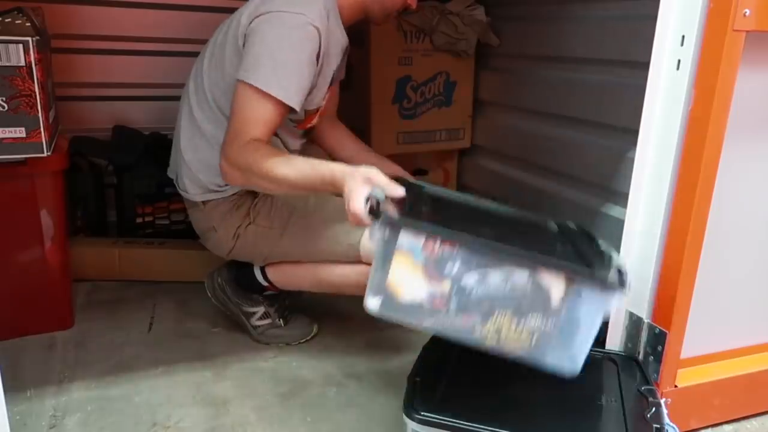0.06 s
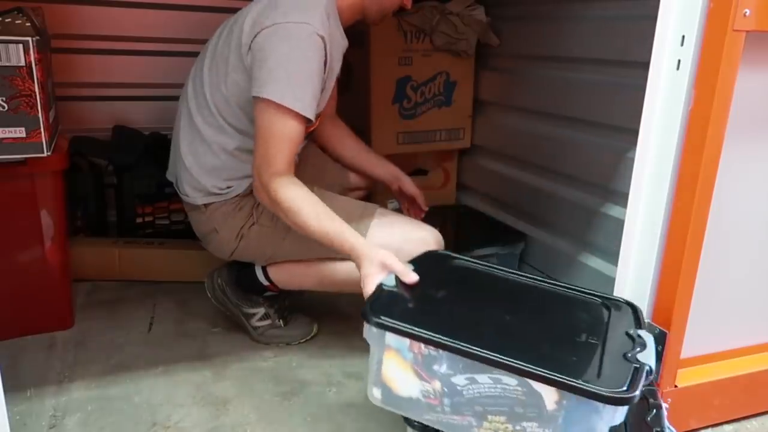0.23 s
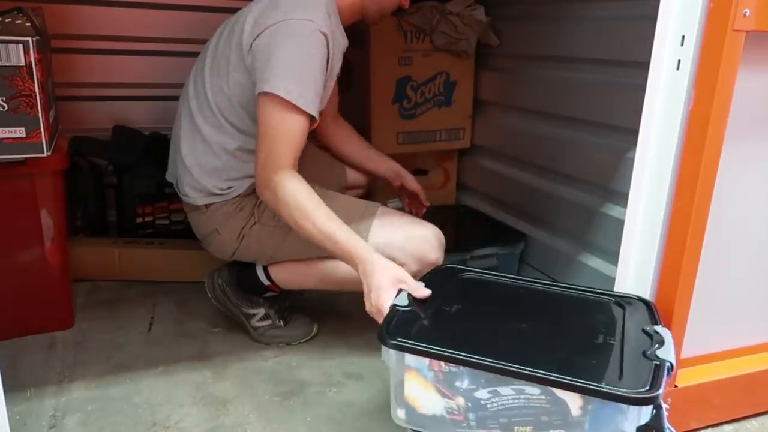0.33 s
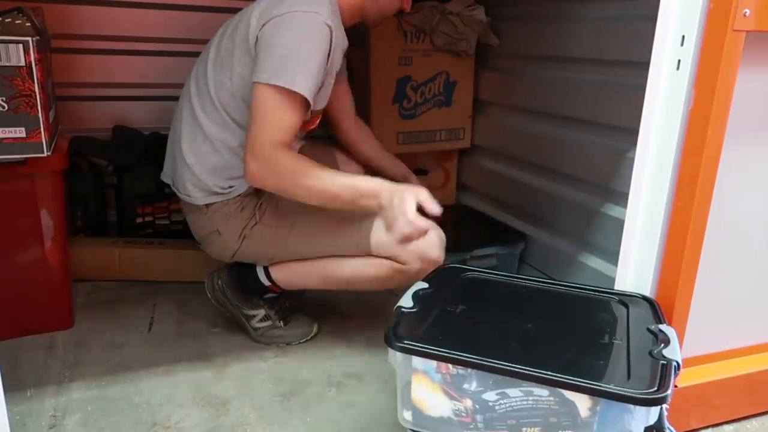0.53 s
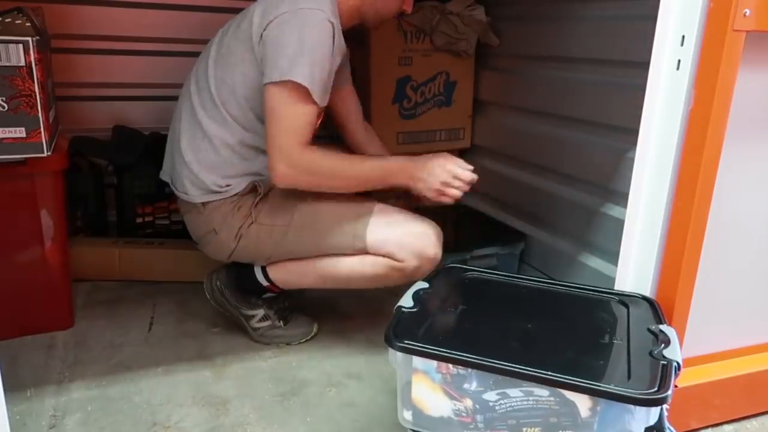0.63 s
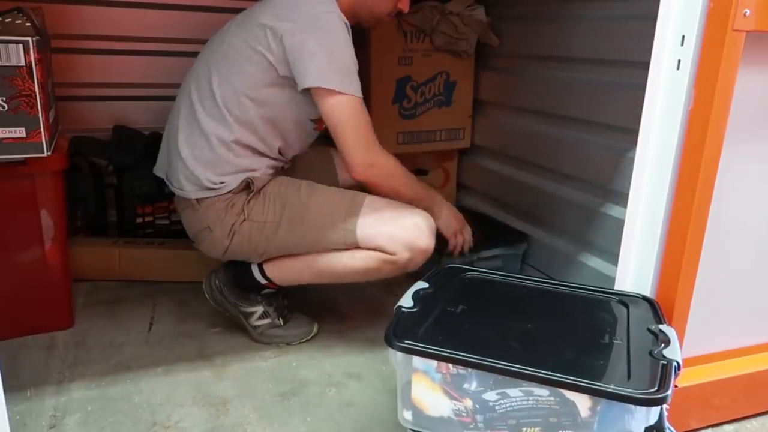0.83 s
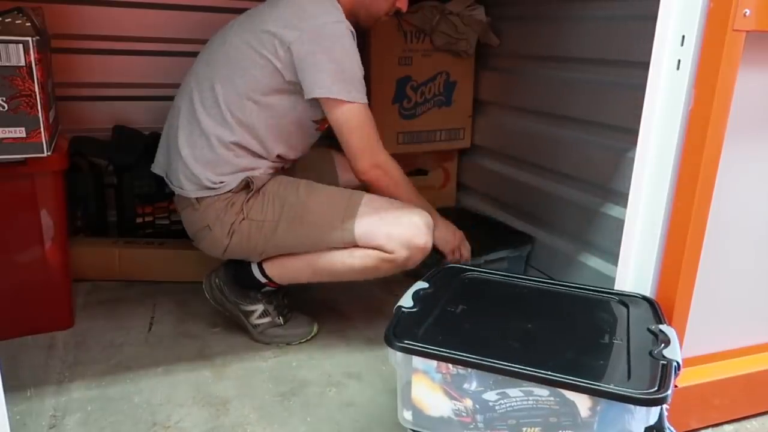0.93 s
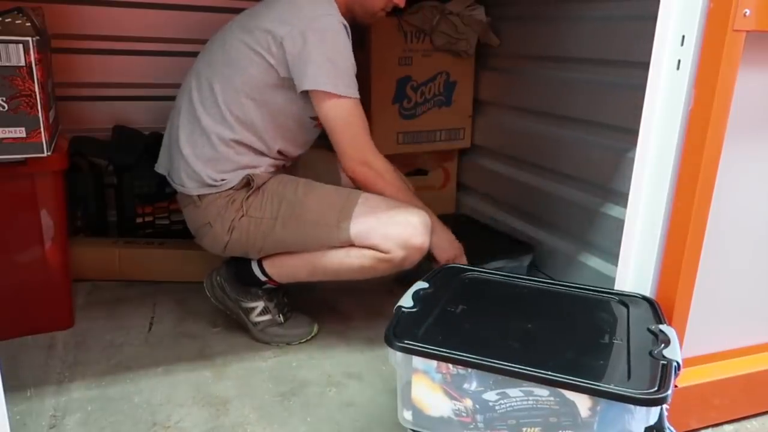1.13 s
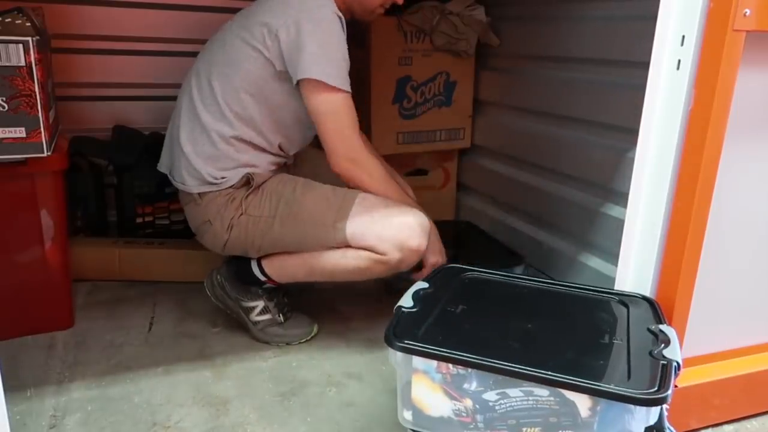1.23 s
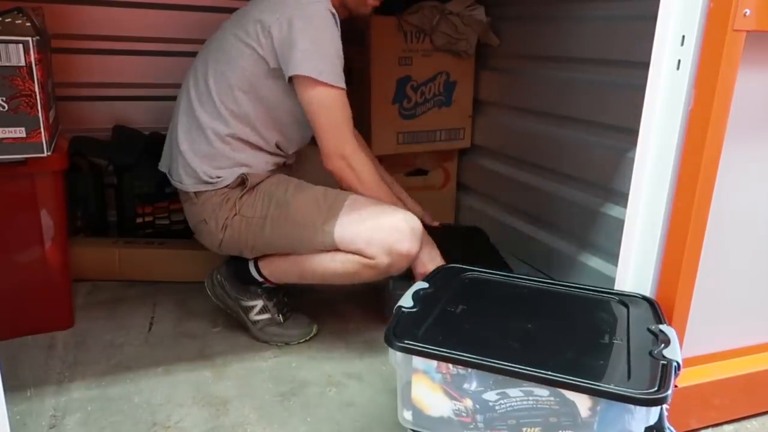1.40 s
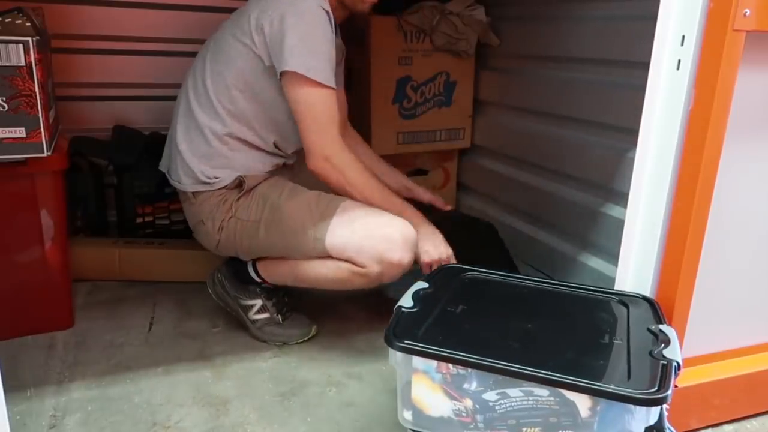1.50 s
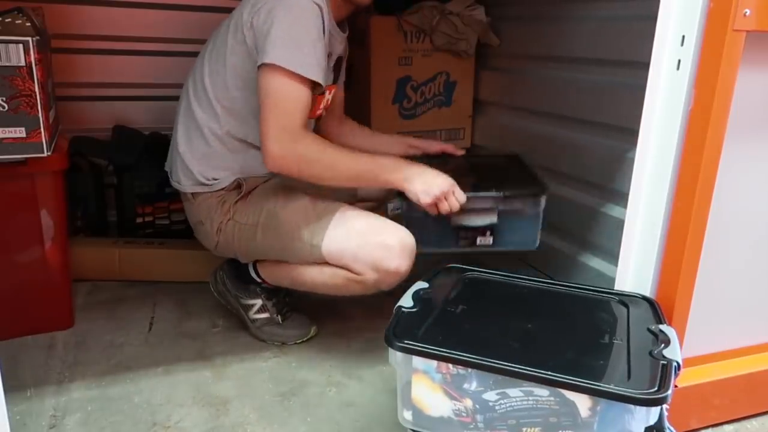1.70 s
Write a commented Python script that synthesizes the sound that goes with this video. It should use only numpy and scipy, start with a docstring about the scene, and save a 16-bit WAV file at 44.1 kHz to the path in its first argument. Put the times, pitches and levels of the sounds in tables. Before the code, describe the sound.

A filled plastic tote drops onto another with a hollow, rattling clack and small rocking knocks, then a second bin scrapes across gritty concrete, slowly then hard, heard close up in a metal storage unit.

```python
"""A low rumble with far hiss from outside fills a sheet-metal storage unit: shaped noise.
A loaded plastic tote is set down on another: it lands in a flurry of contacts and rocks twice.
Each contact rings modes of the walls and rim and rattles the load; the lid sizzles after the landing.
Then a second bin is dragged over the gritty floor, slowly, then with a hard pull: dense random
clicks ring its resonances, and catches add lone hard clicks. The unit answers with a noise tail."""
import sys
import numpy as np
from scipy import signal
from scipy.fft import rfft, irfft
from scipy.io import wavfile

SR = 44100
rng = np.random.default_rng(int(sys.argv[2]) if len(sys.argv) > 2 else 0)


def log_audio(samples):
    """Write samples as a 16-bit WAV file to the path given in sys.argv[1]."""
    # one column per channel
    frames = np.atleast_2d(samples).T
    # limit to full scale, then quantise
    limited = np.clip(frames, -1, 1)
    pcm = np.round(limited * 32767).astype(np.int16)
    wavfile.write(sys.argv[1], SR, pcm)


N = 77175

# main resonances of the dragged bin: pitch_hz, level_db, t60_s
BIN_BODY = [(1173, -6.5, 0.0089), (1550, -1, 0.0094), (1840, -3, 0.015), (2056, -0.5, 0.016),
            (2420, 0, 0.011)]
# higher, edgier resonances of the dragged bin: pitch_hz, level_db, t60_s
BIN_BRIGHT = [(2702, -2.5, 0.0093), (3300, -1.5, 0.0069), (3620, -4, 0.0073), (4170, -7.5, 0.0033)]


def amp(db):
    """Turn decibels into a linear gain."""
    return 10 ** (np.asarray(db) / 20)


def unit(x):
    """Scale a signal to rms 1."""
    return x / np.sqrt(np.mean(x ** 2) + 1e-20)


def in_time(rows):
    """Draw each column of a table as a curve of straight lines over time."""
    time_s, *columns = np.transpose(rows)
    return [np.interp(np.arange(N) / SR, time_s, column) for column in columns]


def colour(x, spectrum):
    """Shape a signal by a (pitch_hz, level_db) table, interpolated over log frequency."""
    table_hz, table_db = np.transpose(spectrum)
    bin_hz = np.maximum(np.arange(N + 1) * SR / (2 * N), 1)
    gain_db = np.interp(np.log(bin_hz), np.log(table_hz), table_db)
    return irfft(rfft(x, 2 * N) * amp(gain_db))[:N]


def low_pass(x, cut_hz):
    """Roll off the treble at 24 dB per octave."""
    return signal.sosfilt(signal.butter(4, cut_hz, fs=SR, output="sos"), x)


def ring(clicks, pitch_hz, t60_s):
    """A damped two-pole resonator: a unit click starts a dying sine of height 1."""
    radius = amp(-60 / (t60_s * SR))
    angle = 2 * np.pi * pitch_hz / SR
    poles = [1, -2 * radius * np.cos(angle), radius * radius]
    return signal.lfilter([0, np.sin(angle)], poles, clicks + 1e-18)


def grains(per_s, spread_db):
    """Random clicks of uneven size and either sign; rms 1."""
    size = amp(spread_db * np.minimum(rng.exponential(1, N), 5))
    size = size * rng.choice([-1, 1], N)
    return unit(size * (rng.random(N) < per_s / SR))


def strike(time_s, level_db, modes, favoured_hz, alternate_sign=True):
    """Every blow strikes every mode; the spot it hits favours the modes near one pitch."""
    spread_db, off_pitch_db_per_octave = 1.55, 11
    out = np.zeros(N)
    uneven = rng.standard_normal((len(time_s), len(modes)))
    for k, (pitch_hz, mode_db, t60_s) in enumerate(modes):
        off_db = off_pitch_db_per_octave * abs(np.log2(pitch_hz / favoured_hz))
        blow_db = level_db + mode_db - off_db + spread_db * uneven[:, k]
        clicks = np.zeros(N)
        # alternating signs from mode to mode spread out the click's spike
        clicks[(time_s * SR).astype(int)] = (-1) ** (k * alternate_sign) * amp(blow_db)
        out += ring(clicks, pitch_hz, t60_s)
    return out


def dying_noise(t60_s):
    """A second of noise that dies away exponentially; unit energy."""
    tail = rng.standard_normal(SR) * amp(-60 / t60_s * np.arange(SR) / SR)
    return tail / np.sqrt(np.sum(tail ** 2))


def background():
    """Outside rumble and far hiss: two shaped noises, heard lower for a while after the landing."""
    # background level over time: time_s, level_db, deep_bass_db
    levels = [(0, -37, -47), (.05, -36, -41.5), (.14, -36, -40), (.22, -37, -34.5), (.3, -38.5, -46),
              (.55, -43.5, -49.5), (.7, -44, -44.5), (.86, -41.5, -45), (1.03, -39, -43.5),
              (1.15, -38, -44.5), (1.5, -42, -48.5), (1.62, -40, -44.5), (1.7, -38, -42.5),
              (1.75, -38, -32)]
    # spectrum of the main noise: pitch_hz, level_db (per Hz)
    air = [(88, -60), (150, -8.5), (462, -6), (509, -7), (736, -15), (860, -13), (1510, -18.5),
           (2310, -16.5), (13800, -62.5), (15500, -73)]
    # spectrum of the deep bass: pitch_hz, level_db (per Hz)
    deep = [(13, -32), (22, -2), (65, 6.5), (113, 4), (145, -8.5), (160, -12), (210, -11), (350, -120)]
    level_db, deep_db = in_time(levels)
    main_noise = amp(level_db) * unit(colour(rng.standard_normal(N), air))
    deep_bass = amp(deep_db) * unit(colour(rng.standard_normal(N), deep))
    return main_noise + deep_bass


def load_rattle(time_s, click_db):
    """Each contact shakes the load, whose dense tiny knocks die away as the shaking does."""
    level_db, t60_s, knocks_per_s, rise_hz = -2.5, 0.076, 13000, 250
    # spectrum of the rattle: pitch_hz, level_db (per Hz)
    rattle_spectrum = [(350, -27), (600, 0.5), (639, -5), (1070, -5.5), (2350, -4), (4400, -18),
                       (6330, -30), (12000, -52), (15600, -74), (22000, -120)]
    kick_power = np.zeros(N)
    kick_power[(time_s * SR).astype(int)] = amp(2 * np.minimum(click_db, -14))
    # powers add up and decay; the root gives the envelope
    shake = np.sqrt(signal.lfilter([1], [1, -amp(-120 / (t60_s * SR))], kick_power + 1e-18))
    # a smoothed envelope softens each onset
    shake = signal.sosfilt(signal.butter(2, rise_hz, fs=SR, output="sos"), shake)
    return amp(level_db) * shake * unit(colour(grains(knocks_per_s, spread_db=2.0), rattle_spectrum))


def tote():
    """Thuds ring the hollow walls, clicks ring the rim and lid, and the load rattles after each."""
    thud_cut_hz, click_cut_hz = 1170, 5800
    # contacts of the tote: time_s, soft_thud_db, thud_favoured_hz, sharp_click_db, click_favoured_hz
    contacts = [(0.2454, -16, 315, -13, 1980), (.2480, -16, 840, -15, 3300), (0.2515, -14, 390, -16, 2000),
                (0.2552, -26, 550, -22, 3000), (0.2571, -24, 900, -4.5, 5800), (.2588, -11, 210, -22, 2540),
                (0.262, -17.5, 226, -25, 2280), (0.2687, -19, 710, -12.5, 2570),
                (0.278, -20.5, 486, -25, 2000), (.283, -18.5, 605, -25.5, 2500),
                (0.292, -23, 310, -32, 2200), (.370, -29, 484, -59, 2000), (.381, -35.5, 483, -34.5, 2800),
                (.385, -55, 480, -26.5, 1360), (.391, -35, 252, -32.5, 2290), (0.399, -42, 250, -40, 1400),
                (0.4261, -45, 450, -32, 1400), (0.429, -38, 447, -31, 2000), (.4395, -46, 453, -34, 3000),
                (.4420, -39, 450, -29, 3300), (.4462, -25.5, 225, -33.5, 1600),
                (0.461, -47, 250, -34, 2840), (.469, -42, 250, -37, 2800), (0.49, -47, 240, -38, 1500)]
    # modes of the hollow walls: pitch_hz, level_db, t60_s
    hollow_walls = [(63.3, -0.5, 0.33), (120, -10, 0.14), (164, -16, 0.08), (222, 1, 0.1),
                    (249, 1.5, 0.099), (300, -5.5, 0.081), (391.6, -5.5, 0.17), (474, -2, 0.11),
                    (515, -0.5, 0.1), (581, 0, 0.057), (720, -0.5, .06)]
    # modes of the rim and lid: pitch_hz, level_db, t60_s
    rim_and_lid = [(915, -6, 0.041), (1154, -5.5, 0.032), (1364, -3, 0.038), (1700, -2.5, 0.015),
                   (2060, 1.5, 0.013), (2350, -3, 0.011), (2870, -0.5, 0.0075), (3210, 3, 0.0068),
                   (3800, -6, 0.0049), (4700, -15, 0.01), (5840, -6.5, 0.0065), (6950, -9, .006)]
    time_s, thud_db, low_hz, click_db, high_hz = np.transpose(contacts)
    thuds = strike(time_s, thud_db, hollow_walls, low_hz, alternate_sign=False)
    clicks = strike(time_s, click_db, rim_and_lid, high_hz, alternate_sign=False)
    rattle = load_rattle(time_s, click_db)
    return low_pass(thuds, thud_cut_hz) + low_pass(clicks, click_cut_hz) + rattle


def sizzle():
    """A dying treble shiver of the loose lid: shaped noise that fades exponentially."""
    start_s, level_db, t60_s = .2455, -29.5, 0.3
    # spectrum of the sizzle: pitch_hz, level_db (per Hz)
    sizzle_spectrum = [(2060, -35), (3500, -2.5), (6320, -6.5), (10800, -26), (12400, -33), (13100, -28),
                       (15500, -34)]
    since_s = np.arange(N) / SR - start_s
    fade = (since_s > 0) * amp(level_db - 60 / t60_s * np.maximum(since_s, 0))
    return fade * unit(colour(rng.standard_normal(N), sizzle_spectrum))


def storage_unit(x):
    """Corrugated walls scatter the sound into a dense tail, band by band."""
    first_echo_s = .006
    # echo bands of the unit: low_hz, high_hz, level_db, t60_s
    echo_bands = [(62, 278, -12, 0.68), (314, 1080, -10.5, 0.27), (1010, 3450, -10, 0.54),
                  (3080, 6200, -12, 0.8), (6200, 9300, -6.5, 0.25)]
    tail = np.zeros(SR)
    for low_hz, high_hz, level_db, t60_s in echo_bands:
        band = signal.butter(2, [low_hz, high_hz], "band", fs=SR, output="sos")
        tail += amp(level_db) * signal.sosfilt(band, dying_noise(t60_s))
    return signal.fftconvolve(x, np.append(np.zeros(int(first_echo_s * SR)), tail))[:N]


def rubbed(grit, modes):
    """Grit clicks ring a set of modes, each at its own level with alternating sign; rms 1."""
    out = np.zeros(N)
    for k, (pitch_hz, level_db, t60_s) in enumerate(modes):
        out += (-1) ** k * amp(level_db) * unit(ring(grit, pitch_hz, t60_s))
    return unit(out)


def drag_rub():
    """Grit under the bin fires dense clicks into its resonances, with a fine hiss on top."""
    grit_per_s, grit_spread_db, grit_cut_hz = 4000, 3, 6100
    # course of the drag; all but level_db are relative to the main resonances:
    # time_s, level_db, brightness_db, wall_boom_db, floor_rumble_db, grit_hiss_db, topmost_hiss_db
    course = [(0.888, -41.5, 9, -22, 9.5, -15, -20), (0.904, -43, 2, -0.5, -5, -12, -25),
              (1.032, -34.5, -5, -5.5, -18, -20.5, -40), (1.066, -33, -8, -1, -3.5, -22, -42),
              (1.144, -33.5, -1, -1, -15, -18, -36), (1.172, -23, -9, -7.5, -19, -22.5, -41),
              (1.19, -29.5, -4, -4, -13, -11.5, -35), (1.214, -20.5, -6, -7.5, -19, -23, -46),
              (1.23, -20.5, -7, -11, -19, -17, -38), (1.244, -19.5, -3.5, -13.5, -18, -25, -37),
              (1.256, -24, 3.5, -6, -11, -11, -33), (1.27, -18, -1, -16, -26, -17, -44),
              (1.284, -25, 5, -7, -38, -11, -29), (1.336, -18, -1.5, -13.5, -24, -15, -37.5),
              (1.358, -21, -4.5, -12.5, -29, -12.5, -34), (1.396, -22.5, -8, -9.5, -10, -15, -44),
              (1.48, -35, -15, -15.5, -18, -14, -33), (1.524, -33, -9, -5, -12, -18.5, -41),
              (1.556, -40, -13, -20, -32, -24, -44), (1.57, -50, -17, -4, 5, -12, -37),
              (1.64, -53.5, -10, 3, 3, -21, -33)]
    # boom of the walls: pitch_hz, level_db, t60_s
    boom = [(606, 1.5, 0.043), (720, 1, 0.02), (960, -0.43, 0.015)]
    # rumble through the floor: pitch_hz, level_db, t60_s
    rumble = [(200, 0, 0.041), (288.5, 1, 0.062), (453, -1, 0.032)]
    # spectrum of the grit hiss: pitch_hz, level_db (per Hz)
    hiss_spectrum = [(2530, -40), (4300, -3), (5250, -7.5), (5720, -10), (7100, -19.5), (8500, -30),
                     (11000, -53), (18700, -120)]
    # spectrum of the topmost hiss: pitch_hz, level_db (per Hz)
    top_spectrum = [(5000, -30), (8500, 3), (14300, -5), (14500, -11), (15500, -55)]
    level_db, bright_db, boom_db, rumble_db, hiss_db, top_db = in_time(course)
    now_s = np.arange(N) / SR
    resting = (now_s < course[0][0]) | (now_s > course[-1][0])
    level_db = np.where(resting, -99, level_db)

    grit = low_pass(grains(grit_per_s, grit_spread_db), grit_cut_hz)
    rub = rubbed(grit, BIN_BODY) + amp(bright_db) * rubbed(grit, BIN_BRIGHT)
    rub = rub + amp(boom_db) * rubbed(grit, boom) + amp(rumble_db) * rubbed(grit, rumble)

    dust = grains(12000, spread_db=1.0)
    hiss = amp(hiss_db) * unit(colour(dust, hiss_spectrum))
    hiss = hiss + amp(top_db) * unit(colour(dust, top_spectrum))
    return amp(level_db) * (rub + hiss)


def drag_catches():
    """The bin catches and jerks free: lone hard clicks ring its resonances."""
    # catches of the bin: time_s, level_db, favoured_hz
    catches = [(.8880, -28, 3100), (.986, -44, 2700), (1.163, -36, 2500), (1.165, -23, 2000),
               (1.211, -12, 2000), (1.243, -27, 2200), (1.265, -13, 2500), (1.2695, -15, 2220),
               (1.284, -12, 3000), (1.293, -36, 2800), (1.301, -9.5, 2500), (1.328, -14, 2500),
               (1.33, -18, 2700), (1.348, -9.5, 2800), (1.391, -18, 1600)]
    time_s, level_db, favoured_hz = np.transpose(catches)
    return low_pass(strike(time_s, level_db, BIN_BODY + BIN_BRIGHT, favoured_hz), 6300)


def scene():
    """Two close microphone ports: alike in the bass, apart in the treble by a smeared difference."""
    smear_t60_s = 0.12
    # stereo width of the tote and bin: pitch_hz, side_level_db
    bins_width = [(60, -42), (110, -45), (200, -46), (380, -30), (700, -29), (1290, -26.5), (2380, -19.5),
                  (4400, -9), (8120, 2.5), (15000, 8)]
    # stereo width of the background: pitch_hz, side_level_db
    background_width = [(60, -43), (110, -39), (200, -23), (380, -21.5), (700, -20), (1290, -13),
                        (2380, -13.5), (4400, -2), (8120, 3.5), (15000, 7)]
    near = tote() + sizzle() + drag_rub() + drag_catches()
    near = near + storage_unit(near)
    smeared = signal.fftconvolve(near, dying_noise(smear_t60_s))[:N]
    # the side takes its own, independent draw of the background
    side = colour(smeared, bins_width) + colour(background(), background_width)
    mid = near + background()
    return np.array([mid + side, mid - side])


def record(dry):
    """Deepest bass is cut, peaks are rounded, the top is cut."""
    bass_cut_hz, ceiling, top_cut_hz = 25, 1.1, 16400
    heard = signal.sosfilt(signal.butter(1, bass_cut_hz, "high", fs=SR, output="sos"), dry)
    rounded = ceiling * np.tanh(heard / ceiling)
    # 70 dB down from top_cut_hz upward
    return signal.sosfilt(signal.cheby2(12, 70, top_cut_hz, fs=SR, output="sos"), rounded)


dry = scene()
out = record(dry)
log_audio(out)
```